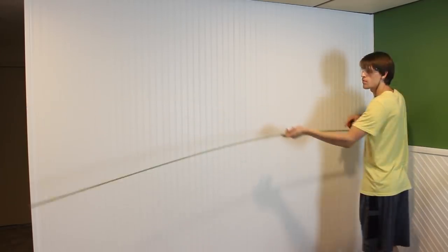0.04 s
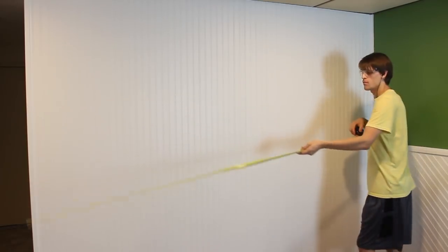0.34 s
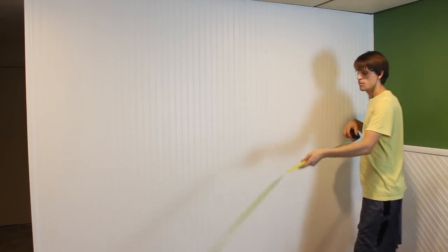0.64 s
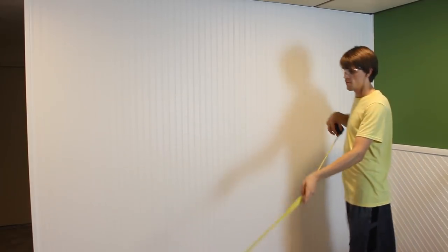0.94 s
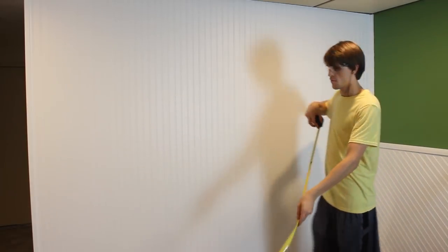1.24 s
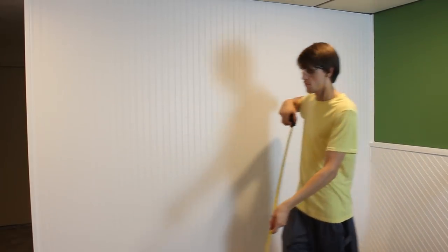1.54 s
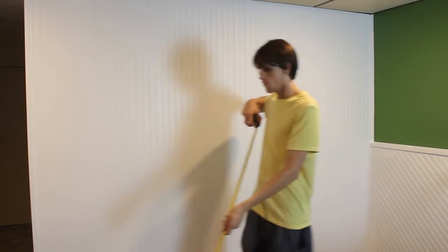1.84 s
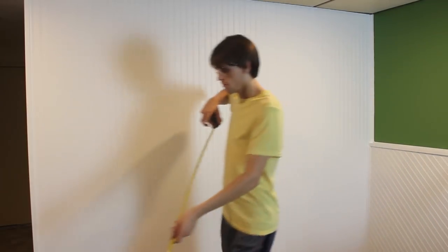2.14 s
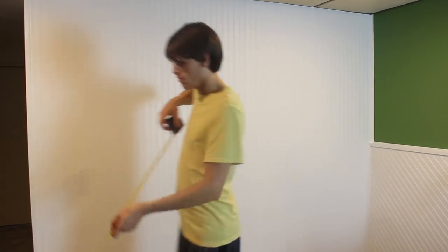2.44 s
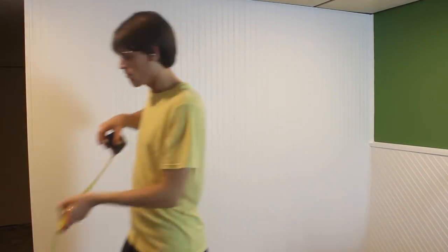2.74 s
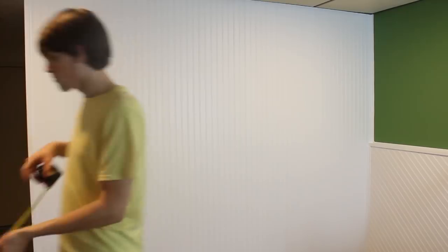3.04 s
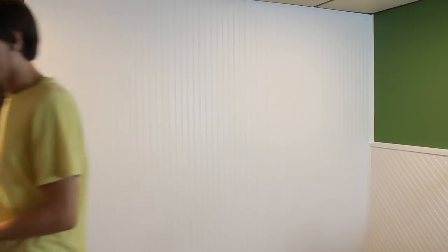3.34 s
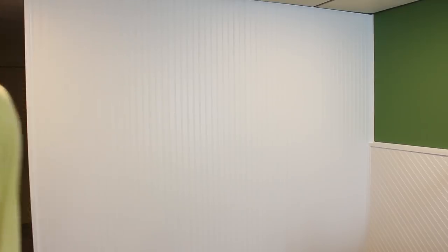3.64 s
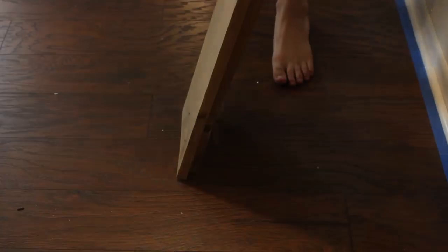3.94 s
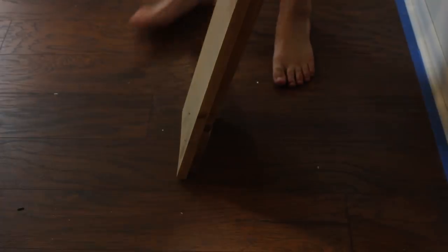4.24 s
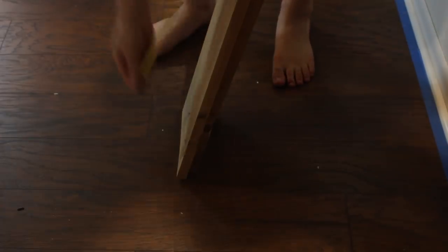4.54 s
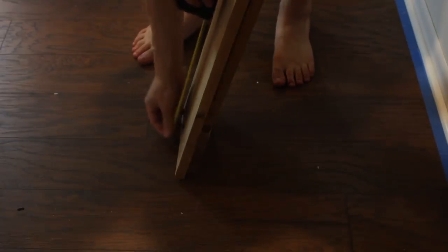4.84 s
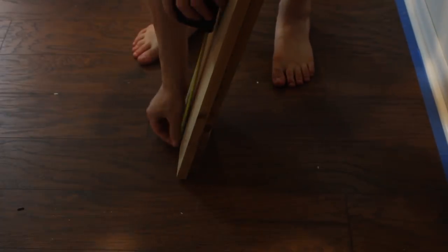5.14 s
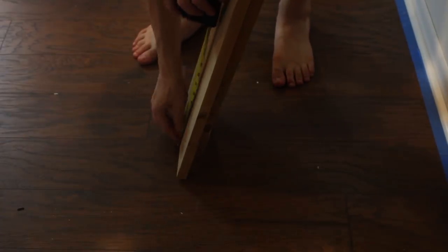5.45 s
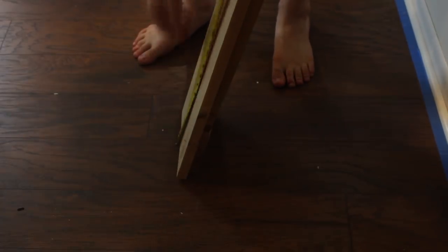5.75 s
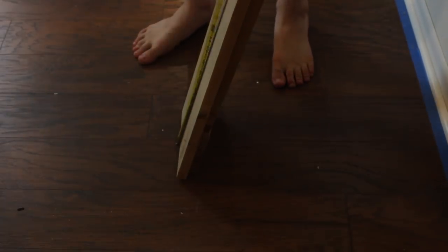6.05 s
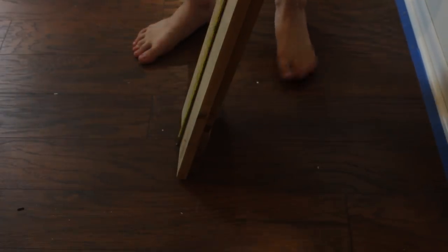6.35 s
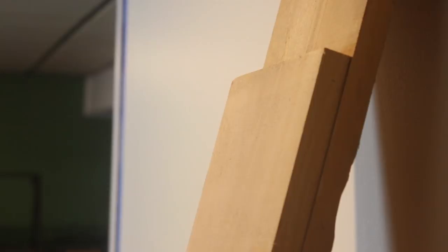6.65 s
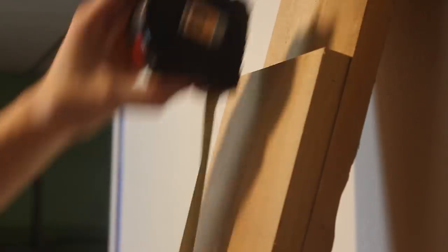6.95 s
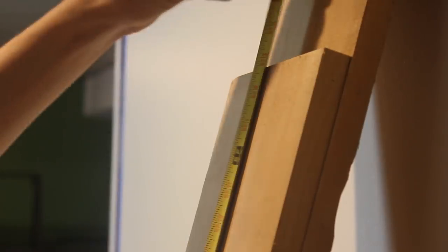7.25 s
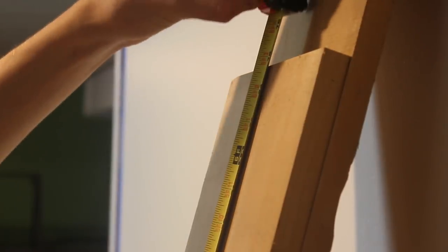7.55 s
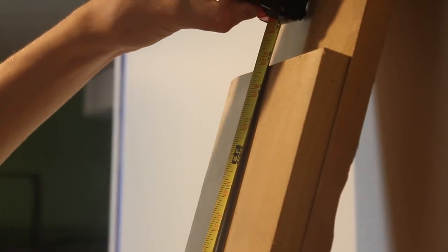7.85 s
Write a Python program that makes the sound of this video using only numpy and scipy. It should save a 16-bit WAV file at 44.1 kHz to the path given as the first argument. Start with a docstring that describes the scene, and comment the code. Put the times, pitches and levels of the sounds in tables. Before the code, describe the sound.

In a bare room, an extended steel tape measure buckles with a loud, bright crash. The blade flaps and scrapes into its case as the reel whirrs, the plastic lock snaps, and bare feet thud faintly away. After an abrupt change of position, the blade rubs, taps and knocks along a wooden board while the case clicks close to the microphone.

```python
"""Steel tape measure in a bare room.

The extended blade buckles with a crash, then scrapes through the case and flaps while the reel whirrs, the lock
snaps and bare feet walk off. Then the scene changes: the blade is drawn along a board, rubbing, tapping and
knocking on the wood while the case clicks in the hand."""
import sys
import numpy as np
from scipy import signal
from scipy.fft import rfft, irfft
from scipy.io import wavfile

SR = 44100
rng = np.random.default_rng(int(sys.argv[2]) if len(sys.argv) > 2 else 0)


def store_pcm(level_fs):
    """Save levels as 16-bit WAV."""
    pcm = np.round(np.clip(level_fs, -1, 1) * 32767).astype(np.int16)
    wavfile.write(sys.argv[1], SR, np.atleast_2d(pcm).T)


N = 352800
T = np.arange(N) / SR

# Spectra of sizzling steel, tapped steel and the board. Each row: frequency in Hz, gain in dB.
SIZZLE_SPECTRUM = [(1500, -33.5), (3500, -11.5), (6500, -1), (9000, -2), (10800, -9), (15500, -11.5)]
STEEL_SPECTRUM = [(880, -32), (1500, -2), (1810, -2), (2450, -2.5), (2750, -2), (3440, -2), (7530, -1),
                  (10900, -13), (13700, -14.5), (15500, -25)]
WOOD_SPECTRUM = [(150, -28), (330, -33), (520, -1.5), (700, -6), (950, 3), (1350, 3), (1800, -2),
                 (2500, -3), (3600, -13.5), (14000, -33)]


def undb(db):
    """Decibels to gain."""
    return 10 ** (np.asarray(db) / 20)


def unit(x):
    """Scale to rms 1."""
    return x / np.sqrt(np.mean(x ** 2))


def decay(t, t60_s):
    """Exponential fall, 60 dB per t60_s."""
    return np.exp(-np.log(1000) * t / t60_s)


def on_log(points, hz):
    """Interpolate (Hz, value) points on a log-frequency axis."""
    points_hz, values = np.transpose(points)
    return np.interp(np.log(hz + 1), np.log(points_hz), values)


def through(x, response):
    """Filter by an impulse response scaled to unit energy."""
    return signal.oaconvolve(x, response / np.linalg.norm(response))[:N]


def colour(x, spectrum, size=4096):
    """Minimum-phase filter shaped by (Hz, dB) points."""
    cepstrum = irfft(np.log(undb(on_log(spectrum, np.fft.rfftfreq(size, 1 / SR)))))
    causal = np.r_[1, np.full(size // 2 - 1, 2), np.zeros(size // 2)]
    return through(x, irfft(np.exp(rfft(cepstrum * causal))))


def ring(x, modes):
    """Drive damped resonances. Each mode: frequency in Hz, width in Hz, level in dB."""
    t, response = T[:4096], 0
    for k, (hz, width_hz, db) in enumerate(modes):
        envelope = t * np.exp(-np.pi * width_hz * t)
        response += undb(db) * unit(envelope * np.sin(2 * np.pi * hz * t + k * np.pi / 2))
    return through(x, response)


def drift(rate_hz):
    """Slow random wander, spread 1."""
    knots = rng.standard_normal(N // 20)
    return np.interp(T * rate_hz, np.arange(len(knots)), knots) * np.sqrt(3 / 2)


def grit(per_s, spread_db):
    """Tiny random contacts of uneven size, rms 1."""
    contacts = rng.random(N) < per_s / SR
    return unit(contacts * rng.standard_normal(N) * undb(spread_db * rng.standard_normal(N)))


def blows(rows, tick, per_s=6000, size=32768):
    """Impulses of weight tick, then fading chatter. Each row: start in s, dB, rise in s, t60 in s."""
    force, t = np.zeros(N + size), T[:size]
    chatter = np.resize(grit(per_s, 0.9), N + size)
    for start_s, db, rise_s, t60_s in rows:
        i = int(np.clip(start_s * SR, 0, N - 1))
        envelope = (1 - np.exp(-t / max(rise_s, 1 / SR))) * decay(t, t60_s)
        force[i:i + size] += undb(db) * envelope / envelope.max() * chatter[i:i + size]
        force[i] += undb(db) * tick
    return force


def strokes(rows, attack_s, release_s):
    """Gain of movements that build, hold and fade. Each row: start in s, length in s, level in dB."""
    gain = 0
    for start_s, length_s, db in rows:
        t = np.maximum(T - start_s, 0)
        gain += undb(db) * (1 - np.exp(-t / attack_s)) * np.exp(-np.maximum(t - length_s, 0) / release_s)
    return gain


def air():
    """Near-steady room air and hiss."""
    # Each row: frequency in Hz, gain in dB.
    spectrum = [(15, -44), (25, -25.5), (64, -6.5), (215, -14), (470, -10), (509, -12.5), (762, -7),
                (826, -4), (896, -1.5), (2120, -14.5), (3010, -10), (4270, -16.5), (5010, -12.5),
                (6050, -15.5), (15500, -18.5)]
    return undb(-59 + 0.24 * drift(7.5)) * colour(rng.standard_normal(N), spectrum)


def channel_hiss():
    """Faint independent noise in each channel."""
    # Each row: frequency in Hz, gain in dB.
    spectrum = [(20, -10.5), (200, -12.5), (1000, -15.5), (15000, -21.5)]
    return undb(-69) * np.array([colour(noise, spectrum) for noise in rng.standard_normal((2, N))])


def buckling(build_s=0.038, boom_width_hz=140):
    """The curved strip snaps through: flexing modes boom at once, dense high modes build to a crash."""
    # Each row: start in s, level in dB, boom offset in dB, main mode in Hz, t60 in s.
    buckles = [(0.8265, -1.5, 3, 668, 0.11), (1.206, -13, 4.5, 613, 0.25), (1.261, -20, 1.5, 566, 0.59),
               (1.473, -20, -6, 610, 0.068), (1.838, -24.5, 4.5, 750, 0.17), (2.547, -34, 6.5, 550, 0.086),
               (2.9225, -15, 2, 972, 0.41), (3.078, -37.5, 18, 846, 0.046), (3.378, -23.5, -28, 580, 0.38)]
    # Modes common to all buckles. Each row: frequency in Hz, width in Hz, level in dB.
    flex_modes = [(580.5, 130, -6.5), (902, 200, 1.5), (1498, 292.5, -3.5), (1900, 160, -6.5)]
    # Each row: frequency in Hz, gain in dB.
    crash_spectrum = [(200, -44.5), (400, -28.5), (560, -16), (900, -12.5), (1200, -5), (1700, -7.5),
                      (2400, -4), (3900, 1), (6000, -1), (8800, -7.5), (10800, -18), (15500, -28)]
    # Harder buckles build longer and sizzle more.
    thrash = [(s, db, build_s * undb(db) ** 2, t60_s) for s, db, _, _, t60_s in buckles]
    sizzles = [(s, 1.6 * db, rise_s, t60_s) for s, db, rise_s, t60_s in thrash]
    cracks = [(s, db - 5.5, 0.0003, 0.014) for s, db, _, _ in thrash]
    crash = colour(blows(thrash + cracks, tick=1, per_s=12000), crash_spectrum)
    sizzle = colour(blows(sizzles, tick=0, per_s=19000), SIZZLE_SPECTRUM)
    boom = 0
    for s, db, boom_db, mode_hz, t60_s in buckles:  # the free length of blade sets mode_hz
        force = blows([(s, db + boom_db, 0.0005, 0.33 * t60_s)], tick=10)
        boom += ring(force, [(mode_hz, boom_width_hz, 0), *flex_modes])
    return undb(-7) * crash + undb(-4) * sizzle + undb(-11) * boom


def thumps():
    """Bare heels and the jolted blade send deep, soft pushes through the floor."""
    # Each row: start in s, level in dB, rise in s.
    hits = [(0.828, -46, 0.0062), (3.03, -57, 0.034), (3.575, -54, .035), (4.62, -75, 0.027),
            (5.06, -63, 0.028)]
    # Each row: frequency in Hz, gain in dB.
    floor_spectrum = [(15, -14.5), (30, 2.5), (45, -5.5), (70, -17), (200, -42), (800, -66)]
    force = blows([(s, db, rise_s, 7 * rise_s) for s, db, rise_s in hits], tick=0)
    return undb(1.5) * colour(force, floor_spectrum)


def sliding():
    """The blade scrapes through the case mouth: a fading pull, then a long creep with faster pushes."""
    # Each row, and the single creep: start in s, length in s, level in dB.
    pushes = [(0.975, 0.082, -34.5), (1.102, 0.056, -28), (1.46, 0.057, -35), (1.8, 0.05, -36.5),
              (2.437, 0.18, -43.5), (2.77, 0.064, -42), (3.548, 0.089, -36), (3.675, 0.19, -35)]
    creep = (0.91, 2.96, -45.5)
    # Each row: frequency in Hz, gain in dB.
    scrape_spectrum = [(150, -34), (300, -14), (550, -14.5), (900, -10), (1600, -4), (3000, -2.5),
                       (4600, -2), (6500, -1.5), (9000, -3), (10600, -11), (15500, -16)]
    first_pull = undb(-47.5) * decay(T, t60_s=0.14)
    speed = first_pull + strokes([creep, *pushes], attack_s=0.027, release_s=0.019)
    scrape = colour(grit(4000, 1.4) * undb(0.89 * drift(70)), scrape_spectrum)
    sing = undb(25.5) * speed * colour(grit(8000, 1.2), SIZZLE_SPECTRUM)  # faster is brighter
    return undb(-1.5) * speed * (scrape + sing)


def reel(start_s=1.3, length_s=1.155, empty_hz=667, full_hz=948, fill_s=0.49, width_hz=170):
    """The coil rubs inside the case; two resonances rise as it fills."""
    hz = full_hz + (empty_hz - full_hz) * np.exp(-np.maximum(T - start_s, 0) / fill_s)
    phase = 2 * np.pi * np.cumsum(hz) / SR
    t, whirr = T[:4096], 0
    for ratio, db in ((1, 0), (1.7, -7)):
        contacts = grit(1200, 3) + 1j * grit(1200, 3)
        rub = through(contacts, t * np.exp(-2 * np.pi * width_hz * ratio * t))
        whirr += undb(db) * np.real(rub * np.exp(1j * ratio * phase))
    return strokes([(start_s, length_s, -46.5)], attack_s=0.028, release_s=0.11) * whirr


def lock():
    """The plastic lock clacks and rebounds."""
    # Each row: start in s, level in dB.
    hits = [(2.2191, -13.5), (2.2238, -11.5), (2.227, -16.5), (2.238, -20)]
    # Each row: frequency in Hz, gain in dB.
    plastic_spectrum = [(200, -33), (600, -13.5), (1700, -15), (2200, 0), (3100, -1), (4200, -7.5),
                        (6500, -8), (9000, -14), (11000, -23), (15000, -20)]
    force = blows([(s, db, 0.0001, 0.014) for s, db in hits], tick=4.8)
    return undb(-2) * colour(force, plastic_spectrum)


def wobbling():
    """The slack blade flexes in soft, irregular pops."""
    # Each row: start in s, length in s, level in dB.
    wobbles = [(2.54, 0.31, -54.5), (3.071, 0.061, -45), (3.263, 0.62, -59)]
    # Each row: frequency in Hz, gain in dB.
    spectrum = [(60, -33), (150, -15.5), (300, -8), (450, -6.5), (600, 2), (800, -8), (1100, -5),
                (1600, -10), (4000, -48)]
    return strokes(wobbles, attack_s=0.0081, release_s=0.064) * colour(grit(220, 2.7), spectrum)


def taps(rise_s=0.001):
    """The blade slaps case or board and rattles; what it hits adds a woody body."""
    # Each row: start in s, level in dB, body offset in dB, t60 in s.
    hits = [(3.965, -31.5, -6, 0.066), (4.006, -21.5, -8, 0.038), (4.0205, -18, -19, 0.03),
            (4.0927, -31.5, -5, 0.06), (4.4257, -31.5, -11, 0.04), (4.768, -35.5, 5.5, 0.038),
            (4.857, -41.5, 5, 0.028), (5.2037, -34.5, 8.5, 0.012), (5.563, -32.5, -5, 0.041),
            (5.6001, -15.5, -4.5, 0.041), (5.754, -24, 1.5, 0.05), (5.8352, -20, 2, 0.071),
            (5.94, -21.5, -31, 0.055), (6.128, -25.5, -5.5, 0.22), (6.6134, -20, -10, 0.071),
            (6.6792, -15.5, -7, 0.017), (6.708, -20.5, -18, 0.029), (6.7471, -17.5, -1, 0.044),
            (6.9205, -28, -1, 0.074), (7.0771, -28.5, -4, 0.065), (7.5722, -46, 9, 0.03)]
    steel = blows([(s, db, rise_s, t60_s) for s, db, _, t60_s in hits], tick=5.5, per_s=3000)
    wood = blows([(s, db + body_db, rise_s, t60_s) for s, db, body_db, t60_s in hits], tick=4.3)
    return undb(-7) * colour(steel, STEEL_SPECTRUM) + undb(-9) * colour(wood, WOOD_SPECTRUM)


def handling():
    """Hands and feet bump dully against board and floor."""
    # Each row: start in s, length in s, level in dB.
    shifts = [(4.02, 0.21, -66), (4.61, 0.075, -59.5), (5.041, 0.11, -61), (5.61, 0.72, -58),
              (6.356, 0.073, -49), (6.589, 0.5, -53)]
    # Each row: frequency in Hz, gain in dB.
    spectrum = [(40, -61), (90, 2.5), (140, 7), (260, 3.5), (400, -4), (900, -65)]
    return strokes(shifts, attack_s=0.0056, release_s=0.093) * colour(grit(500, 6.2), spectrum)


def drawing(attack_s=0.0086, release_s=0.033):
    """Stick-slip along the board: the wood rubs, the steel edge crackles."""
    # Each row: start in s, length in s, rub level in dB, edge level in dB.
    draws = [(4.027, 0.17, -58, -44), (4.26, 0.1, -70, -44.5), (4.744, 0.083, -47.5, -58),
             (5.197, 0.036, -48, -64), (5.449, 0.08, -51, -46), (5.614, 0.26, -36, -37),
             (5.802, 0.95, -39.5, -35.5), (6.807, 0.12, -52, -38.5), (6.912, 0.023, -50, -29),
             (7.083, 0.095, -47.5, -46.5)]
    # Each row: frequency in Hz, gain in dB.
    rub_spectrum = [(250, -12), (500, 8), (700, 6.5), (900, 9), (1250, 14), (1700, 5), (2500, 7),
                    (4500, -56), (12000, -21)]
    slip = undb(2.2 * drift(60))
    rub = colour(grit(900, 2.5), rub_spectrum)
    crackle = colour(grit(1500, 2.2), STEEL_SPECTRUM)
    on_face = strokes([(s, length_s, db) for s, length_s, db, _ in draws], attack_s, release_s)
    on_edge = strokes([(s, length_s, db) for s, length_s, _, db in draws], attack_s, release_s)
    return slip * (undb(-6) * on_face * rub + undb(-12.5) * on_edge * crackle)


def knocks(t60_s=0.077):
    """Hook and hand strike the board with a hollow thud."""
    # Each row: start in s, level in dB, thud offset in dB.
    hits = [(4.045, -39, 14), (4.191, -42, 10), (4.342, -39, 1), (4.613, -39.5, 7.5), (4.652, -36, 4),
            (4.683, -35.5, 3.5), (5.091, -25, -14.5), (5.155, -30.5, -5), (5.642, -42, 6),
            (5.923, -27, 1.5), (5.995, -35.5, 12), (6.154, -25, 2), (6.393, -24.5, -6), (6.532, -26.5, -9),
            (6.709, -32.5, 11.5), (6.82, -27, -3), (6.92, -31, 6.5), (7.062, -32, 0)]
    # Each row: frequency in Hz, gain in dB.
    thud_spectrum = [(50, -24), (130, -19), (330, -6), (520, 0), (660, -4.5), (900, -9), (2500, -34)]
    wood = blows([(s, db, 0.001, t60_s) for s, db, _ in hits], tick=4.4)
    thud = blows([(s, db + thud_db, 0.002, t60_s) for s, db, thud_db in hits], tick=11.4)
    return undb(-9) * colour(wood, WOOD_SPECTRUM) + undb(-16) * colour(thud, thud_spectrum)


def case_clicks(rattle_t60_s=0.17):
    """Short contacts ring the shell brightly; its lower modes chatter on."""
    # Each row: start in s, level in dB.
    hits = [(6.2092, -22), (6.3157, -25.5), (6.3924, -7), (6.5327, -16.5)]
    # Each row: frequency in Hz, gain in dB.
    shell_spectrum = [(900, -27), (2000, -20), (2900, -7), (3500, -14), (4600, -26), (6000, -12),
                      (7100, -2), (8100, 0.5), (9000, -1.5), (10500, -24), (15000, -25)]
    # Each row: frequency in Hz, width in Hz, level in dB.
    shell_modes = [(1370, 500, -10), (2250, 670, 4), (3080, 360, 3)]
    contact = blows([(s, db, 0.0001, 0.007) for s, db in hits], tick=7.3)
    chatter = blows([(s, db - 19, 0.001, rattle_t60_s) for s, db in hits], tick=0)
    return undb(-6) * colour(contact, shell_spectrum) + undb(-4.5) * ring(chatter, shell_modes)


def room(x, wet_db, onset_s, patterns=8, shifts_per_s=130, size=32768):
    """Direct sound plus diffuse echoes fading per octave; their pattern shifts as the source moves."""
    # Each row: frequency in Hz, t60 in s.
    reverb_times = [(100, 0.17), (500, 0.37), (1400, 0.42), (4000, 0.45), (9000, 0.43), (15000, 0.31)]
    t, hz = T[:size], np.fft.rfftfreq(size, 1 / SR)
    octave = np.round(np.log2(np.clip(hz, 128, 16384)))
    onset = 1 - np.exp(-t / onset_s)
    fades = {k: onset * decay(t, on_log(reverb_times, 2 ** k)) for k in np.unique(octave)}
    echoes = 0
    for pattern in range(patterns):
        scatter = np.exp(2j * np.pi * rng.random(len(hz)))
        tail = sum(irfft(scatter * (octave == k)) * fade for k, fade in fades.items())
        crossfade = np.sin(np.pi / 2 * np.minimum((shifts_per_s * T - pattern) % patterns, 2))
        echoes += through(x * crossfade, tail)
    return x + undb(wet_db) * echoes


def scene(switch_s=3.912):
    """Two scenes in one room, played one after the other, switching at switch_s; mono apart from the channel
    hiss."""
    standing = room(buckling() + wobbling() + sliding() + reel(), wet_db=-1, onset_s=0.0013)
    at_board = room(taps() + knocks() + drawing() + handling(), wet_db=-0.5, onset_s=0.0004)
    clack = room(lock(), wet_db=-1, onset_s=0.00053, patterns=2)
    clicks = room(case_clicks(), wet_db=-9, onset_s=0.0005, patterns=2)  # case faces the listener: drier
    mono = np.where(T < switch_s, standing, at_board) + clack + clicks + thumps() + air()
    return mono + channel_hiss()


def record(dry, cutoff_hz=15800):
    """Clip the crash peaks, then low-pass steeply."""
    lowpass = signal.ellip(10, 0.2, 70, cutoff_hz, fs=SR, output="sos")
    return signal.sosfilt(lowpass, np.clip(dry, -0.95, 0.95))


dry = scene()
out = record(dry)
store_pcm(out)
```